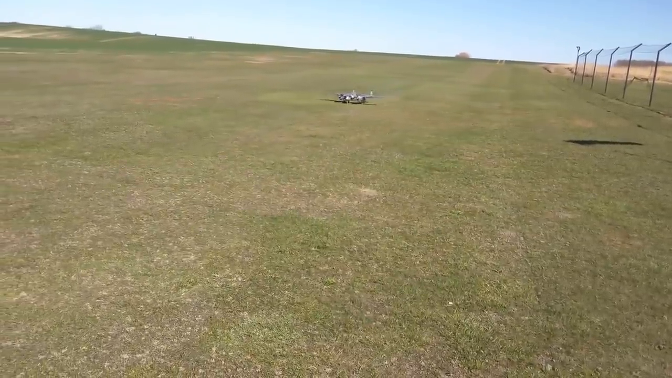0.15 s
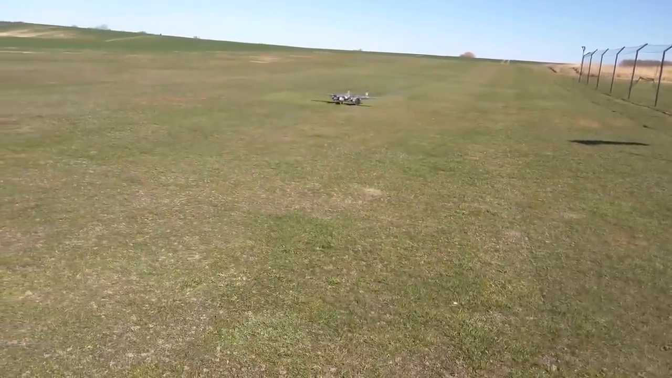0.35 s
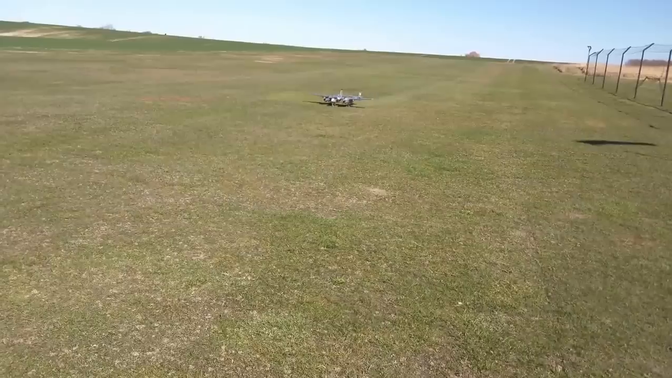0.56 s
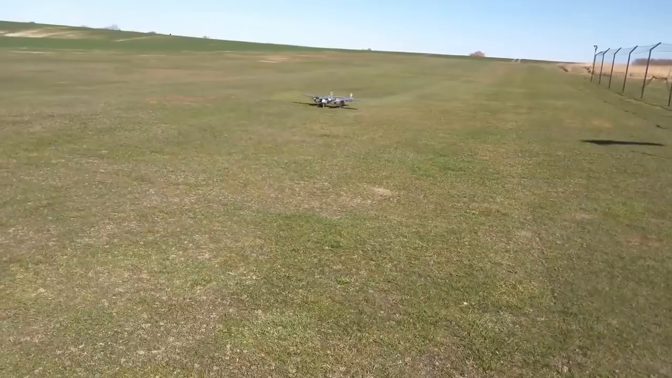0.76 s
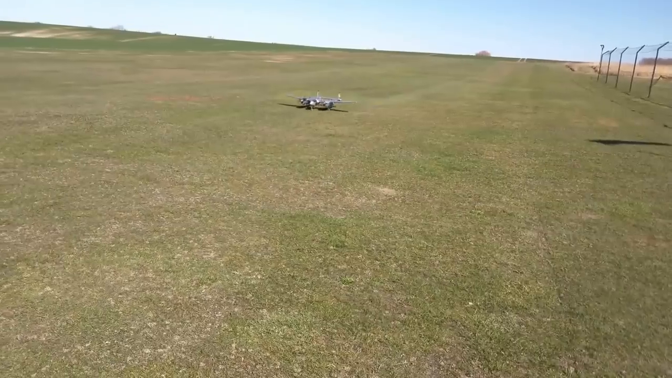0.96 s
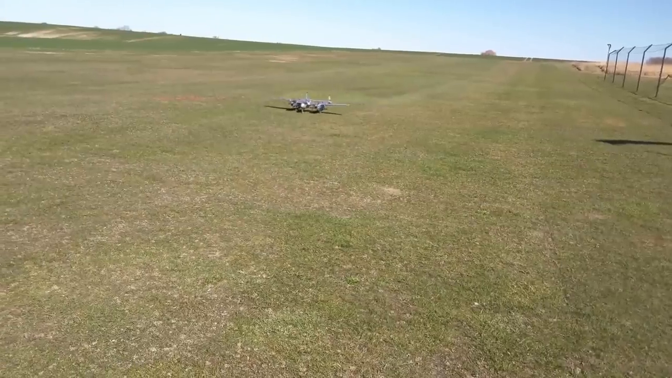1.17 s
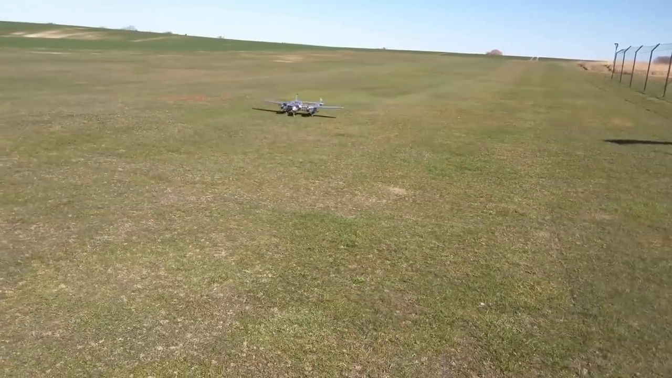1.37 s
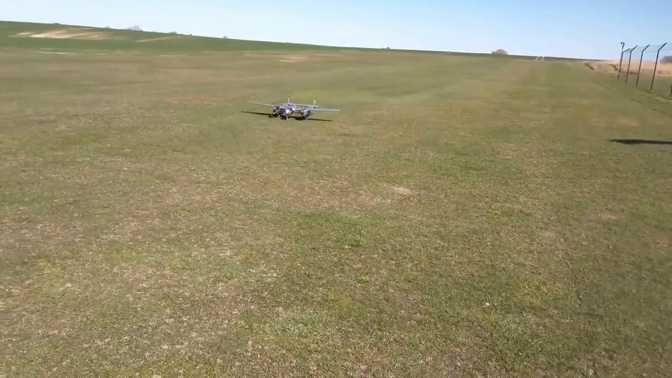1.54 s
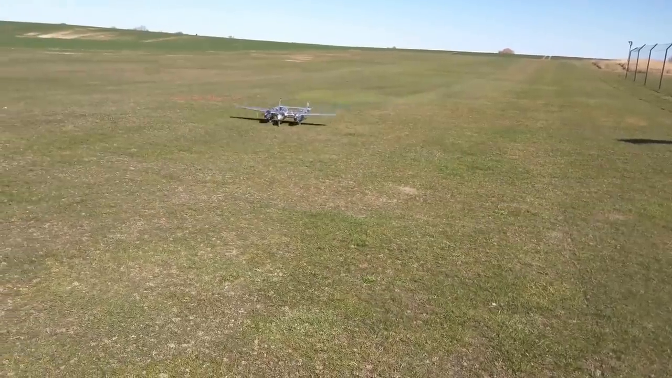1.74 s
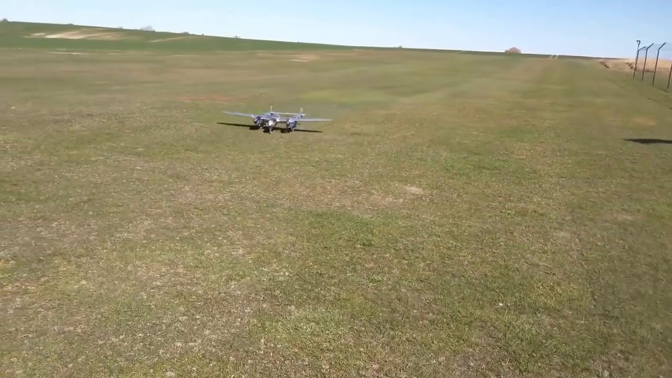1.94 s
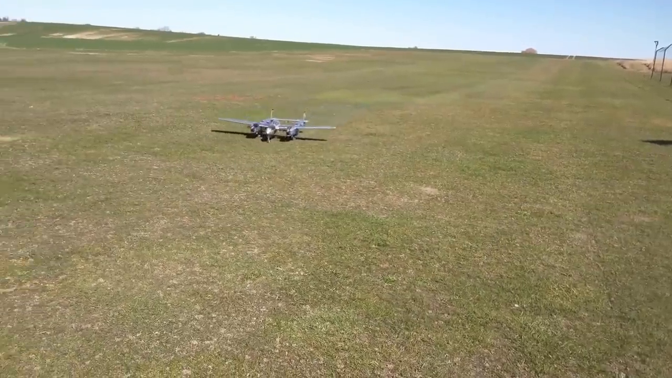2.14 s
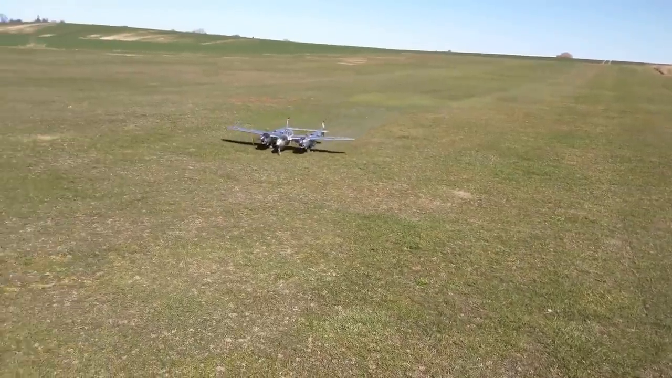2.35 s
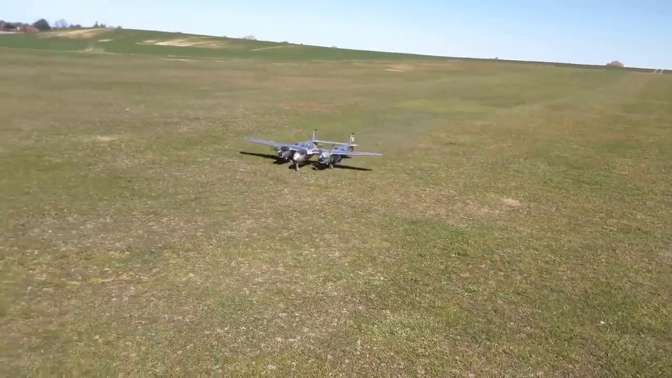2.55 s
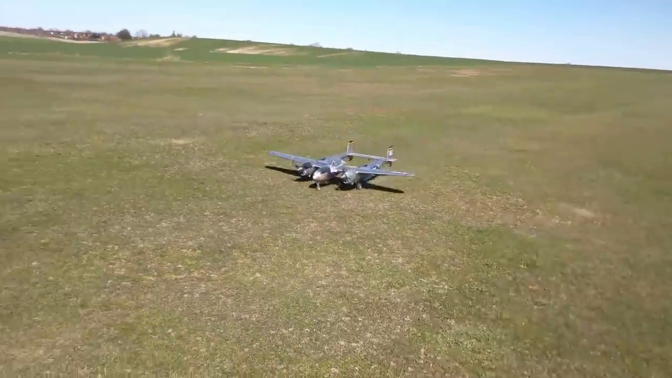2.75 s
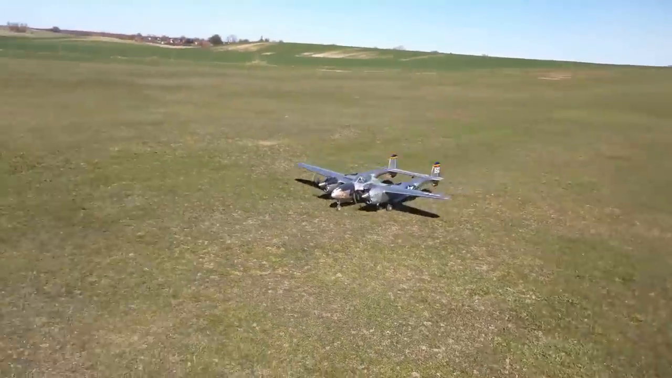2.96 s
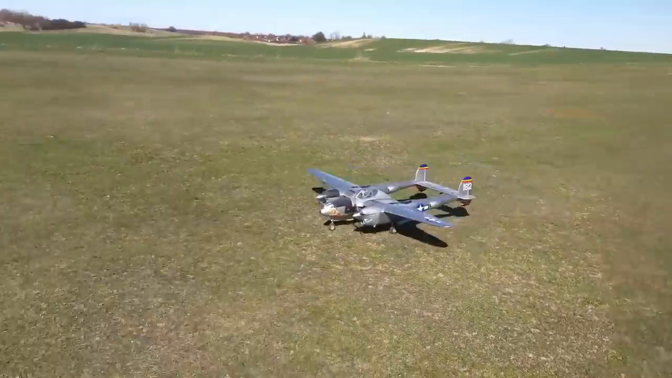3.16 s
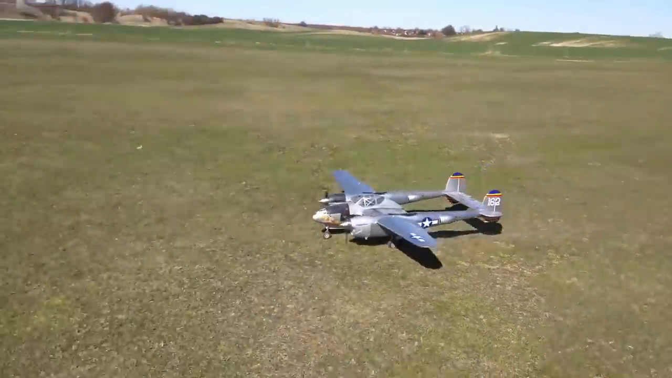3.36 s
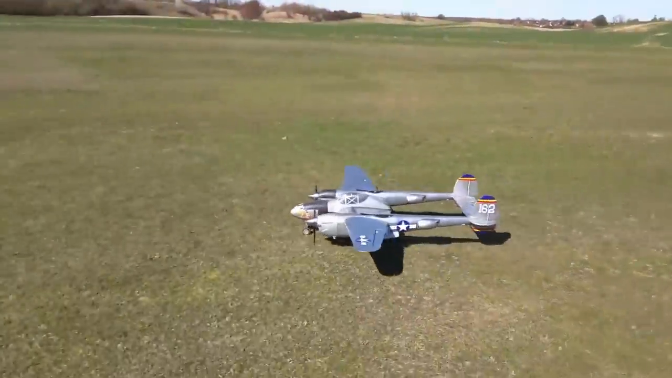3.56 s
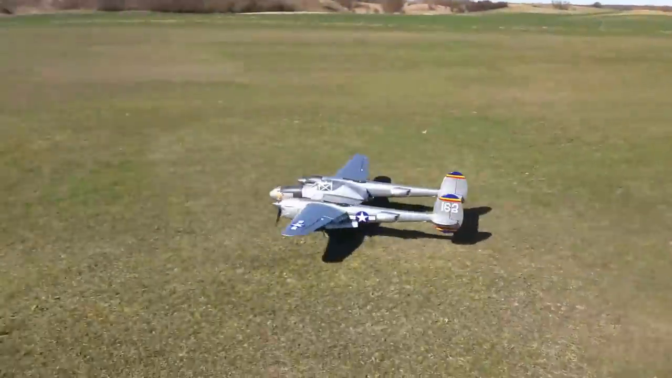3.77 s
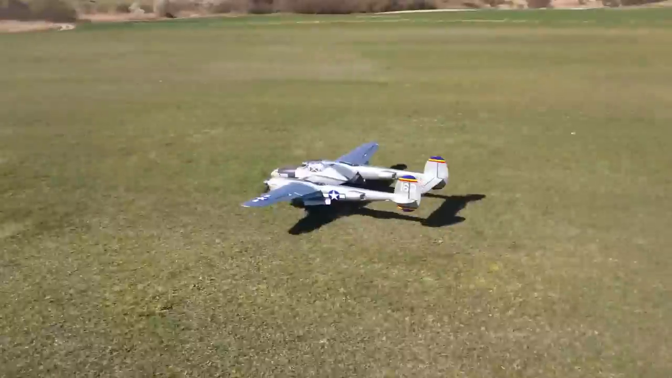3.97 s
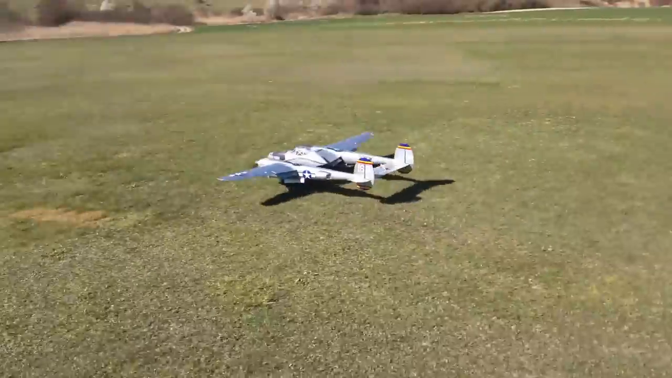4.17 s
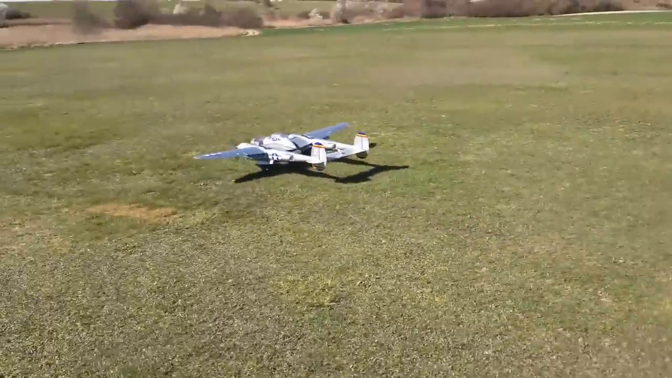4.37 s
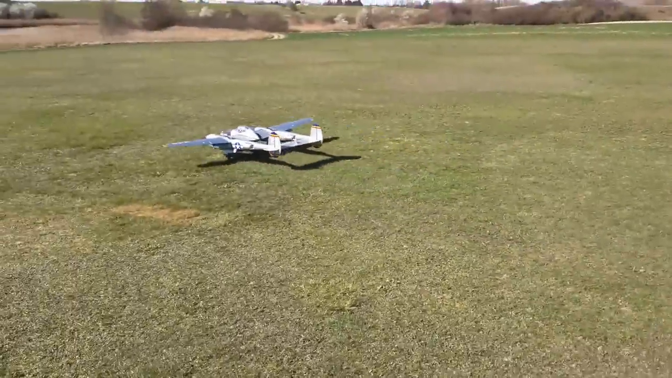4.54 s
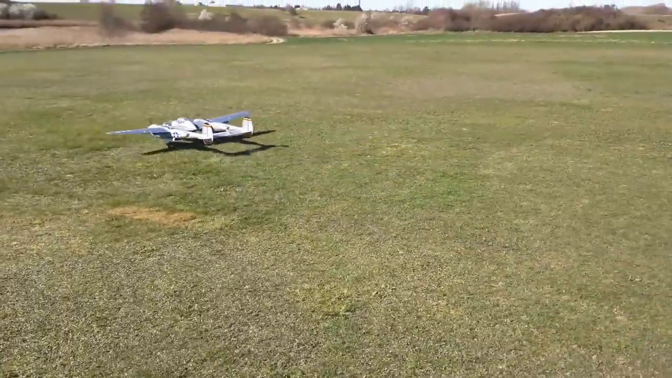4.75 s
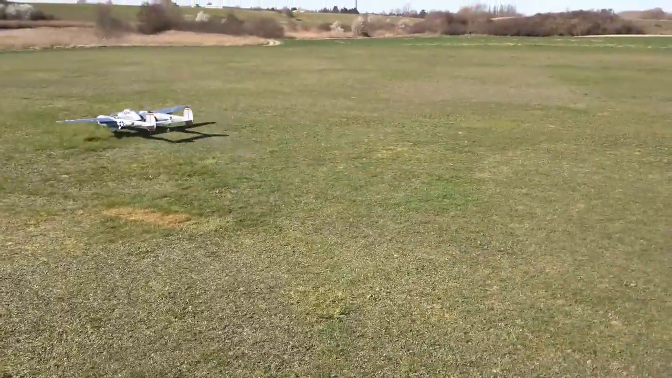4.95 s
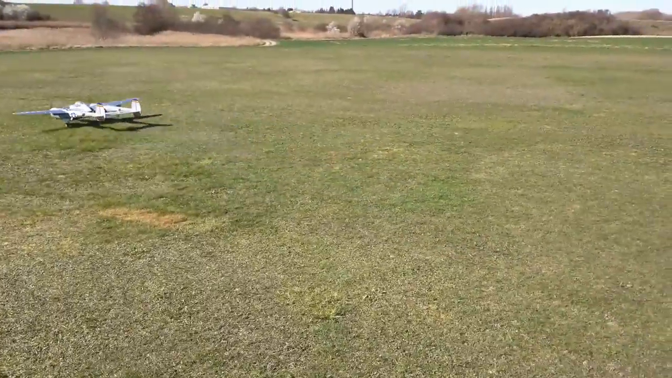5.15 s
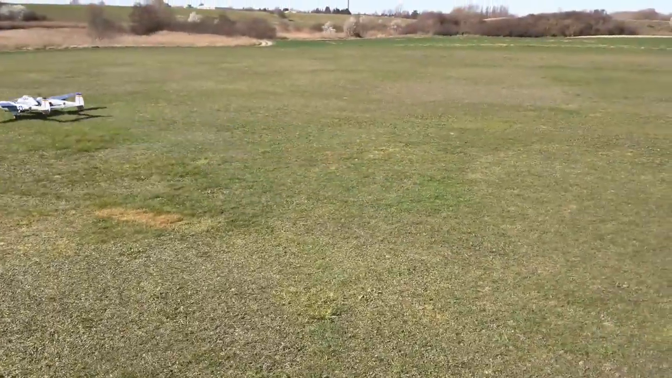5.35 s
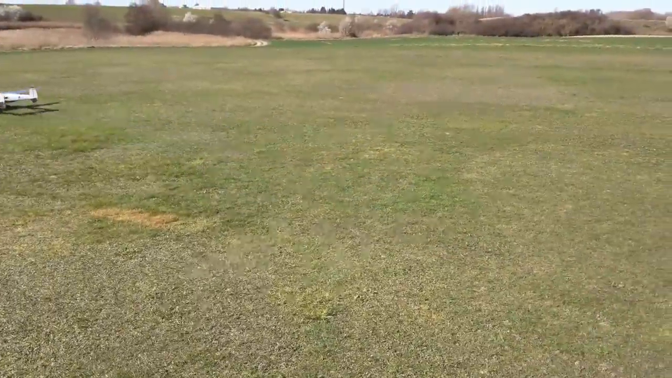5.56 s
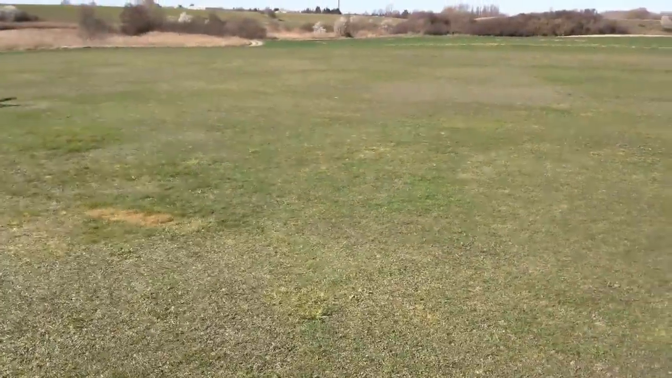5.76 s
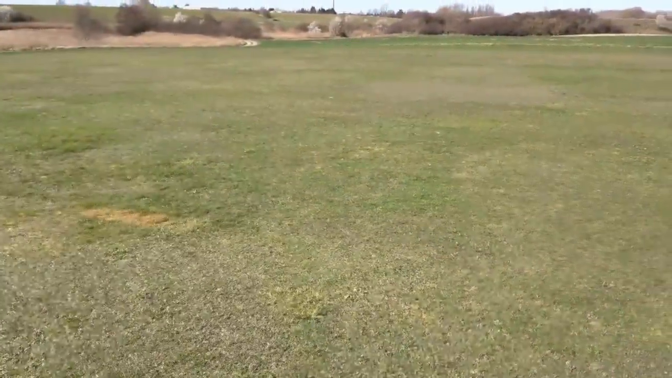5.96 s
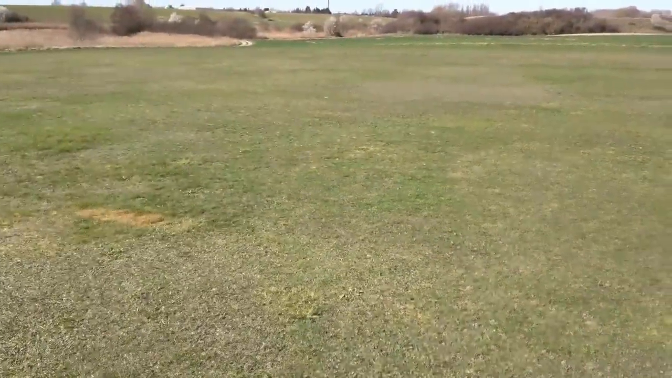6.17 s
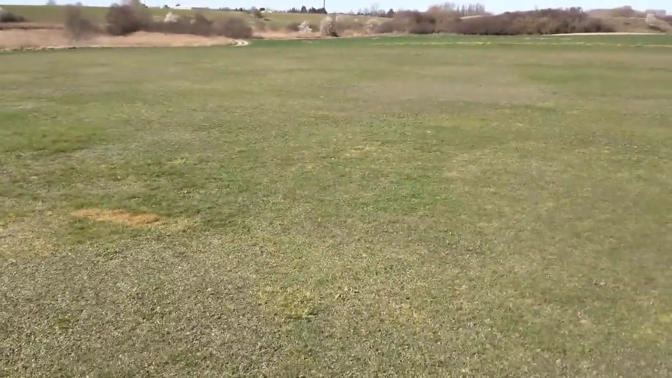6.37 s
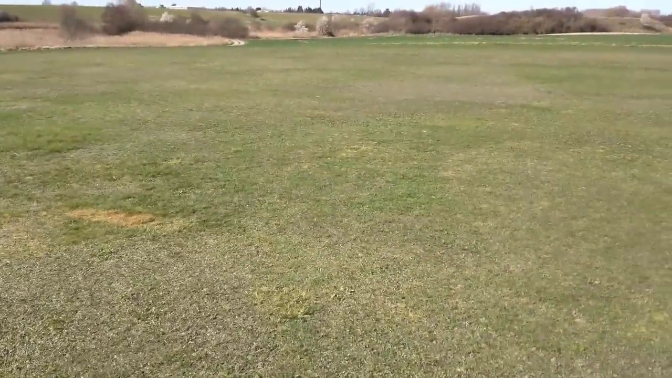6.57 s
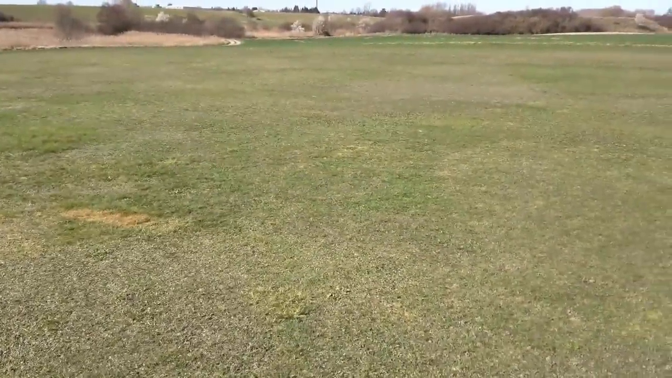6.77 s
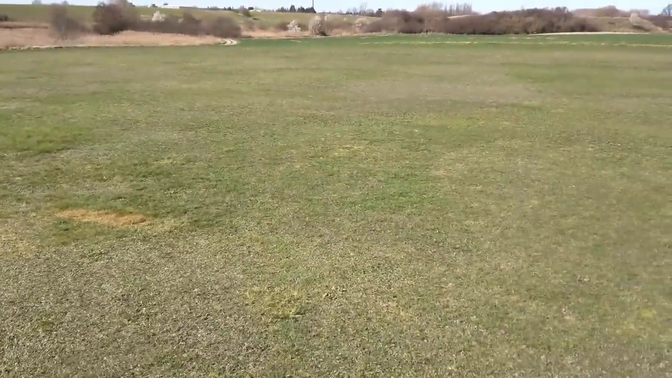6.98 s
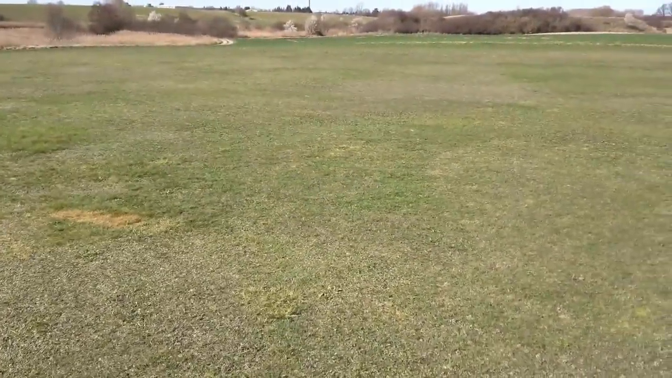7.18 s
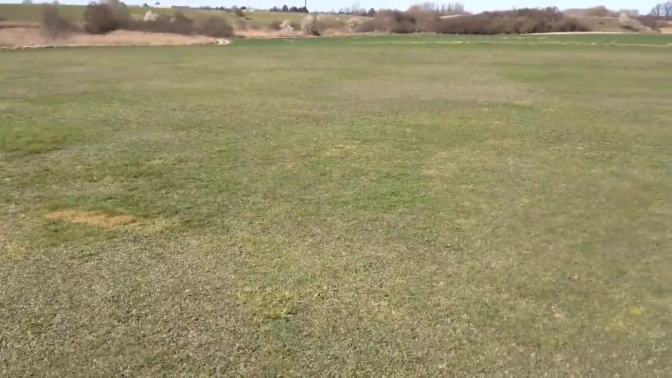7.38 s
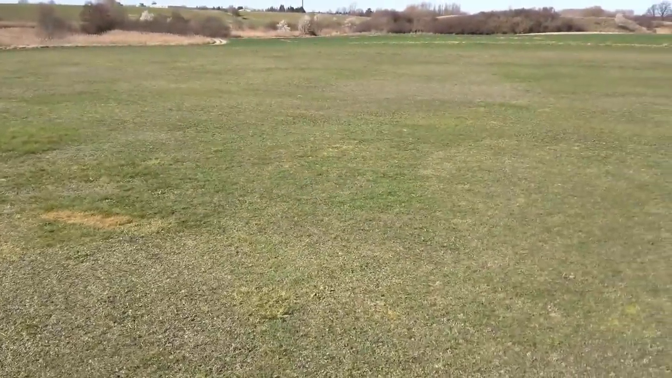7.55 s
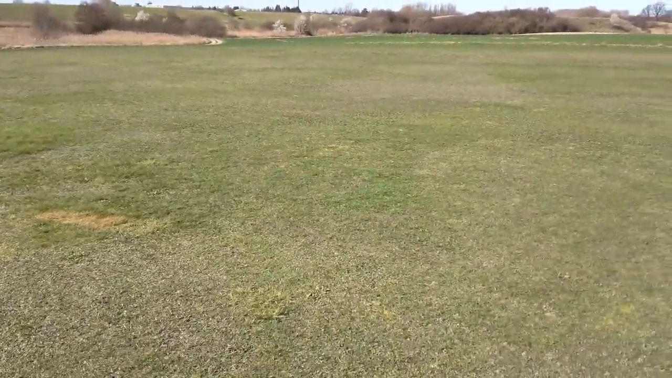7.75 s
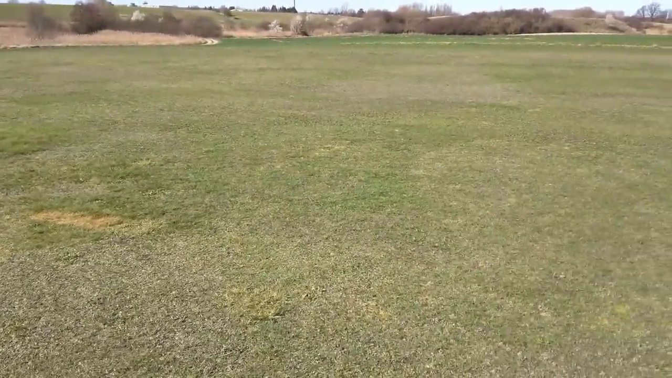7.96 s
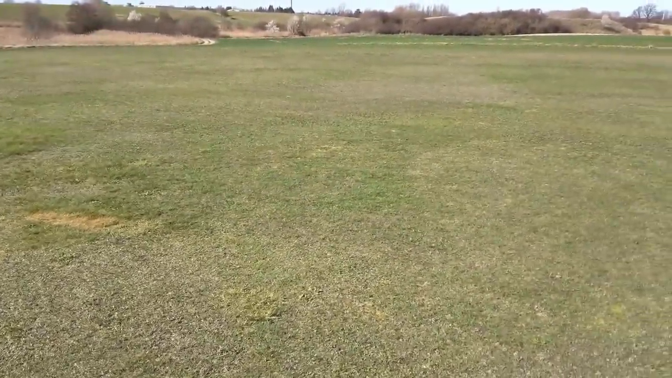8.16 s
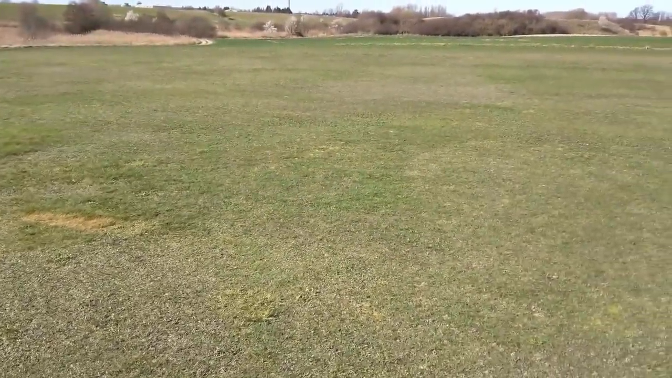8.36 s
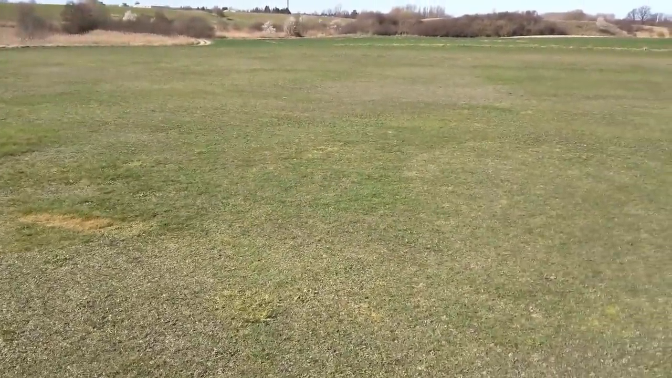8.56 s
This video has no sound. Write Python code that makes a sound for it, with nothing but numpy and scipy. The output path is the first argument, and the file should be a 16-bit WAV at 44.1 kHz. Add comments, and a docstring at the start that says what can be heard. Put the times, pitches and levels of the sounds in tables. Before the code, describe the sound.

Two small single-cylinder engines rattle unevenly as a large model plane taxis past on grass, swelling, then receding to a lumpy idle in gusty wind.

```python
"""Two single-cylinder engines rattle unevenly as a large model plane taxis past on grass.
One engine slows to an idle, the other dips and then revs up; in spells each fires well only every other turn.
Each firing pulse rings a muffler as thump, boom and bark, and most spit a jet of hiss; hard burns crack.
Propeller wash is shaped noise with an airframe echo; wind is noise under a gusty level curve."""
import sys
import numpy as np
from scipy import signal
from scipy.fft import rfft, irfft, next_fast_len
from scipy.io import wavfile
from scipy.ndimage import map_coordinates

SR = 44100
rng = np.random.default_rng(int(sys.argv[2]) if len(sys.argv) > 2 else 0)


def wav_out(sig):
    """Save sig, one row per channel (or a flat mono array), as 16-bit PCM at SR to the path in sys.argv[1]."""
    wavfile.write(sys.argv[1], SR, np.round(np.clip(np.atleast_2d(sig).T, -1, 1) * 32767).astype(np.int16))


N = 380141

# Engine speeds. Each row: time in seconds, speed in turns per second.
SPEED_ONE = [(0.0, 41.13), (0.93, 44.47), (1.56, 42.9), (1.73, 44.01), (2.23, 41.61), (2.51, 41.14),
             (2.71, 39.85), (3.59, 42.37), (4.03, 40.91), (4.24, 41.43), (4.5, 40.43), (4.74, 40.77),
             (5.2, 35.03), (5.56, 32.16), (5.92, 30.23), (6.32, 29.84), (7.08, 25.11), (8.62, 24.71)]
SPEED_TWO = [(0.0, 30.77), (0.26, 33.58), (0.52, 32.08), (1.07, 34.06), (2.33, 34.5), (2.69, 35.28),
             (3.02, 32.78), (3.25, 34.18), (3.97, 33.51), (4.72, 33.3), (5.22, 30.6), (5.54, 27.24),
             (5.99, 26.92), (6.37, 25.83), (6.74, 27.62), (7.31, 33.91), (8.2, 37.83), (8.62, 35.16)]
# Treble of exhausts and propellers. Each row: time in seconds, spit and hiss in relative dB.
TREBLE_LEVELS = [(0.2, -43, -45), (0.85, -36, -36.5), (1.02, -31.5, -34), (2.0, -23, -31.5),
                 (2.85, -19, -27), (3.55, -20.5, -25.5), (3.85, -25, -28.5), (4.5, -23.5, -31.5),
                 (5.05, -30, -37), (5.6, -36.5, -39), (6.25, -35.5, -41), (6.7, -47.5, -47),
                 (7.25, -53, -57), (7.7, -43.5, -44.5), (8.1, -43.5, -46), (8.62, -45, -54)]
# Firings that burn hard. Each row: time in seconds, peak of the gas flow in relative dB.
HARD_BURNS = [(1.828, -17), (2.986, -10.5), (3.638, -12.5), (4.532, -14), (4.559, -13.5), (5.149, -16.5),
              (5.38, -20.5), (5.441, -23), (5.502, -21.5), (5.564, -18), (5.626, -22), (5.632, -19),
              (5.689, -20), (5.743, -21.5), (5.752, -22), (5.817, -22), (5.881, -23.5), (5.891, -22.5),
              (5.949, -25), (5.982, -24.5), (6.015, -24), (6.082, -22), (6.148, -23), (6.228, -27),
              (6.248, -22), (6.315, -24), (6.350, -27), (6.383, -22.5), (6.453, -29.5), (6.522, -28.5),
              (6.556, -33), (6.697, -33), (6.735, -33)]
MID_ECHO, TREBLE_ECHO, CRACK_ECHO = 0.72, 0.65, 0.62  # echo amplitude ratios


def amp(db):
    """Amplitude ratio of a level in dB."""
    return 10 ** (np.asarray(db) / 20)


def unit(x):
    """x scaled to rms 1."""
    return x / np.sqrt(np.mean(x ** 2) + 1e-20)


def curves(rows):
    """One value per sample for each column after the time."""
    s, *columns = np.transpose(rows)
    t = np.arange(N) / SR
    return [np.interp(t, s, column) for column in columns]


def wobble(knots_per_s):
    """A smooth random curve through normally distributed knots."""
    knots = rng.standard_normal(int(N * knots_per_s / SR) + 4)
    return map_coordinates(knots, [np.arange(N) * knots_per_s / SR])


def noise():
    """White noise at rms 1."""
    return rng.standard_normal(N)


def ring(x, spectrum):
    """x through a causal, minimum-phase body with this spectrum, at rms 1."""
    size = 2 * next_fast_len(N // 2 + SR // 4)
    hz, db = np.transpose(spectrum)
    gain = amp(np.interp(np.log(np.fft.rfftfreq(size, 1 / SR) + 1), np.log(hz), db))
    # folding the cepstrum onto positive times gives minimum phase
    cepstrum = irfft(np.log(gain))
    cepstrum[1:size // 2] *= 2
    cepstrum[size // 2 + 1:] = 0
    response = np.exp(rfft(cepstrum))
    return unit(irfft(rfft(x, size) * response)[:N])


def pulses(times_s, sizes, width_s):
    """Bell-shaped pulses, each summing to its size."""
    at = np.round(times_s * SR).astype(int)[:, None] + np.arange(-SR // 200, SR // 200)
    bell = np.exp(-.5 * ((at / SR - times_s[:, None]) / width_s) ** 2)
    bell *= sizes[:, None] / bell.sum(1, keepdims=True)
    inside = (at >= 0) & (at < N)
    return np.bincount(at[inside], bell[inside], N)


def turbulence(flow, linger_s, tail_db):
    """Noise carried by bursts of gas flow; each burst leaves eddies that linger."""
    keep = np.exp(-1 / (linger_s * SR))
    power = flow ** 2
    tail = signal.lfilter([1 - keep], [1, -keep], power)
    return unit(noise() * np.sqrt(power + amp(tail_db) ** 2 * tail))


def path():
    """Straight roll-past: spreading gain (dB), nose towards listener (+1 to -1), metres rolled away."""
    pass_s, closest_m, roll_m_per_s = 3.77, 3.04, 3.79
    along_m = roll_m_per_s * (np.arange(N) / SR - pass_s)
    distance_m = np.hypot(along_m, closest_m)
    return 20 * np.log10(closest_m / distance_m), -along_m / distance_m, np.maximum(along_m, 0)


def facing(x, split_hz=1300):
    """The plane sounds raspy nose-on and dull tail-on: up to 1 dB more or less above the split."""
    rasp_db = path()[1]
    low = signal.sosfiltfilt(signal.butter(3, split_hz, fs=SR, output="sos"), x)
    return unit(low + amp(rasp_db) * (x - low))


def airframe(x, strength, phase_rad=1.94):
    """A short echo off the airframe with a moving delay cuts moving notches."""
    # Each row: time in seconds, echo delay in ms.
    echo_delays = [(0, 1.56), (2, 1.54), (2.7, 1.394), (3.5, 1.34), (4.5, 1.43), (5, 1.374), (6.6, 1.19),
                   (8.62, 1.2)]
    jolt_ms, jolts_per_s = 0.028, 14
    # jolts over the grass shake the delay, most when side-on
    side_on = np.sqrt(1 - path()[1] ** 2)
    delay_ms = curves(echo_delays)[0] + jolt_ms * side_on * wobble(jolts_per_s)
    echo = np.real(signal.hilbert(x, next_fast_len(N))[:N] * np.exp(1j * phase_rad))
    when = np.arange(N) - delay_ms * SR / 1000
    return unit(x + strength * map_coordinates(echo, [when]))


def hump(rows, octaves, hz, t):
    """Gain (dB) of a sliding band, frequency by time."""
    s, centre_hz, height_db = np.transpose(rows)
    away = np.log2((hz[:, None] + 1) / np.interp(t, s, centre_hz)) / octaves
    return np.interp(t, s, height_db) / (1 + away ** 2)


def beamed(x, octaves):
    """A broad treble hump and two narrow bands slide; the power expected from the mean spectrum stays."""
    # Each row: time in seconds, centre in Hz, height in dB (a negative height is a dip).
    beam, side_lobe, dip = [(0, 10040, 13.5), (2.1, 10830, 15), (2.8, 8500, 12), (3.3, 9300, 4),
                            (4.1, 10400, 6), (4.55, 7160, 5.5), (5.05, 6550, 5.5), (5.25, 10700, 4.5),
                            (5.6, 10300, 9), (6.15, 9150, 9.5), (7.6, 7440, 15), (8.62, 8100, 2)], [(0.7, 7500, 3), (2.6, 6640, 0), (3.5, 5890, 5), (4.4, 5600, 1),
                                          (5.4, 5300, 9), (6.3, 5900, -2)], [(0, 4500, 3), (1.3, 5200, -3.5), (2.4, 4140, 1),
                                                        (2.9, 7100, 2.5), (3.6, 8200, -4), (4.5, 8000, -6),
                                                        (5.4, 8430, -5), (6.1, 6840, -5)]
    hz, t, z = signal.stft(x, SR, nperseg=128)
    gain_db = hump(beam, octaves, hz, t)
    gain_db += hump(side_lobe, 0.058, hz, t)
    gain_db += hump(dip, 0.046, hz, t)
    gain = amp(gain_db)
    power = np.mean(abs(z) ** 2, axis=1)
    return unit(signal.istft(z * gain / np.sqrt(power @ gain ** 2), SR, nperseg=128)[1][:N])


def effort():
    """Gain (dB) that rises with the mean speed of the two engines."""
    taxi_turns_per_s, db_per_turn_per_s = 40.6, 0.3048
    speed = (curves(SPEED_ONE)[0] + curves(SPEED_TWO)[0]) / 2
    return db_per_turn_per_s * (speed - taxi_turns_per_s)


def idling(turns_per_s):
    """0 from 40 turns per second up, 1 from 30 down."""
    return np.clip((40 - turns_per_s) / 10, 0, 1)


def limping(spells, ease_s=0.098):
    """The limp at each sample; every spell eases in and out."""
    t = np.arange(N) / SR
    return sum(limp * np.interp(t, [start - ease_s, start, end, end + ease_s], [0, 1, 1, 0])
               for start, end, limp in spells)


def engine(speeds, spells, push_scatter_db, spit_scatter_db, thump_limp):
    """One firing a turn: the port opens with a pop, and the gas jet peaks just after."""
    jitter_s, wander_s, wanders_per_s = 0.00007, 0.00016, 12
    lead_s, spit_width_s, crack_reach_s = 0.002411, 0.0008, 0.006
    speed, limp = curves(speeds)[0], limping(spells)
    turn = np.cumsum(speed) / SR
    count = np.arange(1, int(turn[-1]) + 1)
    at = np.searchsorted(turn, count)
    chance = rng.standard_normal((len(count), 3))
    # firings run early or late: independent jitter plus slow random swings
    times_s = at / SR + jitter_s * chance[:, 0] + wander_s * wobble(wanders_per_s)[at] - .0006
    # a poor burn leaves a richer charge for the next turn; low speed sharpens the alternation
    idle = idling(speed[at])
    charge = np.tanh((1 + 2 * idle) * limp[at]) * (-1) ** count
    # a hard burn pushes harder and cracks instead of spitting
    hard = np.any([abs(times_s - s) < crack_reach_s for s, _ in HARD_BURNS], axis=0)
    push = (1 + thump_limp * charge) * amp(push_scatter_db * chance[:, 1] + 1.5 * hard)
    spit = ~hard * (1 + charge) / (1 + 0.36 * abs(charge)) * amp(spit_scatter_db * chance[:, 2])
    pop = pulses(times_s - lead_s, push, width_s=0.00003)
    puff = pulses(times_s - lead_s / 2, push, width_s=0.00069)
    # at idle the small charge escapes in a shorter, sharper spit
    jet = pulses(times_s, spit, spit_width_s * (1 - 0.075 * idle[:, None]))
    return pop, puff, jet


def exhausts():
    """Both engines ring their mufflers and spit; the boom gains on the thump towards tail-on."""
    # Spells of limping. Each row: start in seconds, end in seconds, limp (above 0 favours even turns,
    # below 0 odd ones).
    limps_one, limps_two = [(0.45, 1.05, -0.3), (5.42, 6.05, -0.8), (6.22, 6.55, 0.3), (6.75, 7.35, -0.45),
                            (7.75, 8.62, 0.6)], [(0, 0.5, -0.85), (0.75, 2.6, 0.85), (2.7, 3.85, 0.5),
                                               (4.2, 5.1, -0.9), (5.4, 5.6, -0.6), (6.2, 6.75, -0.8),
                                               (7.25, 8.62, 0.55)]
    # Muffler and jet spectra, putt as heard from behind. Each row: frequency in Hz, density in dB per Hz.
    thump_body, boom_body, bark_body = [(30, -39), (100, -29), (170, -8), (215, 0), (250, -0.5),
                                        (300, -5.5), (370, -8), (450, -17), (640, -15), (1000, -31),
                                        (2500, -51.5), (6000, -143)], [(30, -24.5), (80, -19), (125, -9), (165, -1.5),
                                                       (215, -1), (350, -14), (1000, -66), (4000, -118.5)], [(100, -16.5), (400, -1.5), (500, 4),
                                                                     (585, 10), (655, 13.5), (770, 1.5),
                                                                     (1050, -3), (1300, -5), (1650, -8),
                                                                     (2400, -8), (2800, -23), (3400, -17),
                                                                     (5000, -29), (12000, -9.5)]
    putt_body, spit_body = [(60, -18.5), (170, -4), (280, 1.5), (360, -1.5), (460, -15.5), (620, -22.5),
                            (790, -11.5), (1080, -15.5), (1500, -30.5), (4000, -66)], [(500, 3.5), (2500, -2.5), (4000, -1.5), (5500, 0.5), (7000, 3),
                                          (9000, 1.5), (12000, 1.5), (14000, 3), (16000, 0)]
    # Each row: time in seconds, putt level in dB.
    putt_levels = [(0, -62), (3, -46), (3.8, -36), (4.6, -43), (5.8, -40.5), (6.8, -40.5), (7.4, -41),
                   (8.0, -40.5), (8.62, -39.5)]

    spread_db, nose, away_m = path()
    # the mufflers point sideways and a little back
    aim = np.exp(-((nose + 0.68) / 0.55) ** 2)
    heard_db = spread_db + effort()
    thump_db = -16 + heard_db - 2 * aim - 0.58 * away_m
    bark_db = -25.5 + heard_db + 2 * aim - 0.78 * away_m
    boom_over_thump_db = -2.94 - 3.5 * nose + 4 * aim
    spit_db = curves(TREBLE_LEVELS)[0] - 6.5

    pop1, puff1, jet1 = engine(SPEED_ONE, limps_one, push_scatter_db=1.0, spit_scatter_db=1.2,
                               thump_limp=0.19)
    pop2, puff2, jet2 = engine(SPEED_TWO, limps_two, push_scatter_db=2.0, spit_scatter_db=2.2,
                               thump_limp=0.58)
    second = amp(-7.5)
    pop = pop1 + second * pop2
    puff = puff1 + second * puff2
    pop = unit(pop - pop.mean())
    # engine one's share of the jet grows nose-on
    jet_one = amp(9 + 3.5 * nose)
    jet = np.hypot(jet_one * jet1, amp(7.0) * jet2) / np.hypot(1, jet_one)

    # churned air roughens the notes, more while the mufflers face the listener, less with metres rolled away
    churn = amp((boom_over_thump_db + 4.5) / 2 + 3 * aim - away_m)
    thump = amp(thump_db) * ring(pop + 0.57 * churn * noise(), thump_body)
    putt = amp(curves(putt_levels)[0]) * ring(pop, putt_body)
    boom = amp(thump_db + boom_over_thump_db) * ring(pop + 0.46 * churn * noise(), boom_body)

    rough = churn * amp(-4 * nose)
    rough_puff = rough * turbulence(puff, linger_s=0.0055, tail_db=11.0)
    bark = ring((pop + rough_puff) / np.hypot(1, rough), bark_body)
    bark = amp(bark_db) * airframe(facing(bark), MID_ECHO)

    spit = ring(turbulence(jet, linger_s=0.0027, tail_db=-15), spit_body)
    spit = amp(spit_db) * airframe(beamed(spit, octaves=0.37), TREBLE_ECHO)
    return thump + putt + boom + bark + spit


def propellers():
    """Air torn by the blades rushes and hisses between the firings."""
    # Each row: frequency in Hz, density in dB per Hz.
    rush_body, hiss_body = [(40, -19), (150, 6.5), (300, -5.5), (480, 1.5), (900, -8), (1500, -13),
                            (2500, -17), (4500, -43), (16000, -20)], [(1000, -12), (2400, 4.5), (3300, 6), (4300, 1.5), (7000, -0.5),
                                          (9800, 1.5), (12000, -1), (16000, -3)]
    spread_db, _, away_m = path()
    rush_db = -29 + spread_db - 1.5 * away_m + 2.14 * wobble(14)
    hiss_db = curves(TREBLE_LEVELS)[1] - 6.0 + 1.9 * wobble(70)
    rush = airframe(facing(ring(noise(), rush_body)), MID_ECHO)
    hiss = airframe(beamed(ring(noise(), hiss_body), octaves=0.6), TREBLE_ECHO)
    return amp(rush_db) * rush + amp(hiss_db) * hiss


def wind_strength():
    """The lumpy breeze with a short swell for each gust, in relative dB."""
    # Each row: time in seconds, strength in relative dB.
    breeze_levels = [(0, -37.5), (0.6, -27), (1.75, -32.5), (2.0, -36.5), (2.92, -34), (3.02, -21),
                     (4.6, -22.5), (5.5, -29), (7.5, -31.5), (7.8, -27.5), (8.62, -25.5)]
    # Each row: peak time in seconds, rise and fall time in seconds each, peak in relative dB.
    gust_swells = [(0.063, 0.1, -21.5), (0.782, 0.062, -25), (0.945, 0.053, -21.5), (1.404, 0.033, -23),
                   (3.072, 0.015, -14), (3.115, 0.019, -17), (3.401, 0.057, -16), (4.122, 0.044, -20),
                   (4.293, 0.045, -22), (5.565, 0.031, -16.5), (5.631, 0.018, -20), (5.88, 0.094, -19),
                   (6.273, 0.042, -18), (6.467, 0.093, -20), (6.66, 0.018, -12.5), (6.943, 0.21, -25.5),
                   (7.312, 0.066, -21), (7.612, 0.038, -20), (7.771, 0.021, -15.5), (7.804, 0.015, -13),
                   (7.889, 0.015, -21), (7.969, 0.025, -14), (8.159, 0.014, -19.5), (8.331, 0.014, -17.5)]
    lump_db, lumps_per_s = 2.5, 18
    t = np.arange(N) / SR
    breeze = amp(curves(breeze_levels)[0] + lump_db * wobble(lumps_per_s))
    gusts = sum(np.interp(t, [s - length, s, s + length], [0, amp(db), 0])
                for s, length, db in gust_swells)
    return 20 * np.log10(np.hypot(breeze, gusts))


def wind():
    """Gusts buffet the microphone in lumps, over the steady air of the field."""
    # Each row: frequency in Hz, density in dB per Hz.
    buffet_body, thud_body, air_body = [(8, -20), (25, 2), (55, -1), (90, -6.5), (140, -16), (250, -20.5),
                                        (500, -35.5), (2000, -61.5)], [(20, -12.5), (55, -7), (85, -5), (130, -1.5),
                                                        (250, -19.5), (600, -38), (2000, -74)], [(40, 1.5), (280, -0.5), (380, -5),
                                                                      (470, -4.5), (620, -10), (900, -7),
                                                                      (1500, -14), (2200, -21.5),
                                                                      (4500, -21.5), (9000, -21),
                                                                      (16000, -46)]
    strength_db = wind_strength()
    rumble = unit(amp(0.093 * wobble(22)) * ring(noise(), buffet_body))
    rumble = amp(strength_db - 3.0) * rumble
    # hard gusts shed smaller eddies: a higher thud that grows faster than the rumble, up to a cap
    thud_db = 1.52 * np.minimum(strength_db, -17) + 3.0
    thud = amp(thud_db) * ring(noise(), thud_body)
    air = amp(-45.0) * ring(noise(), air_body)
    return rumble + thud + air


def cracks(width_s=0.0007):
    """Each hard burn leaves the muffler as one short, bright burst."""
    # Each row: frequency in Hz, density in dB per Hz.
    crack_body = [(300, -1), (950, 9), (1500, -7), (4000, -10), (6000, 1.5), (8000, 3.5), (12000, 2),
                  (14500, 3), (16000, 0)]
    s, peak_db = np.transpose(HARD_BURNS)
    # unit-sum pulses rescaled to their peak
    flow = pulses(s, amp(peak_db), width_s) * width_s * SR * np.sqrt(2 * np.pi)
    burst = ring(turbulence(flow, linger_s=0.002, tail_db=-17), crack_body)
    return flow.std() * airframe(beamed(burst, octaves=0.17), CRACK_ECHO)


def scene():
    """All sources summed, as one channel."""
    return (exhausts() + propellers() + wind() + cracks())[None]


def record(dry):
    """A sharp band limit removes everything from top_hz up."""
    top_hz = 15850
    size = next_fast_len(N + SR // 4)
    passed = np.fft.rfftfreq(size, 1 / SR) < top_hz
    return irfft(rfft(dry, size) * passed, size)[:, :N]


dry = scene()
out = record(dry)
wav_out(out)
```